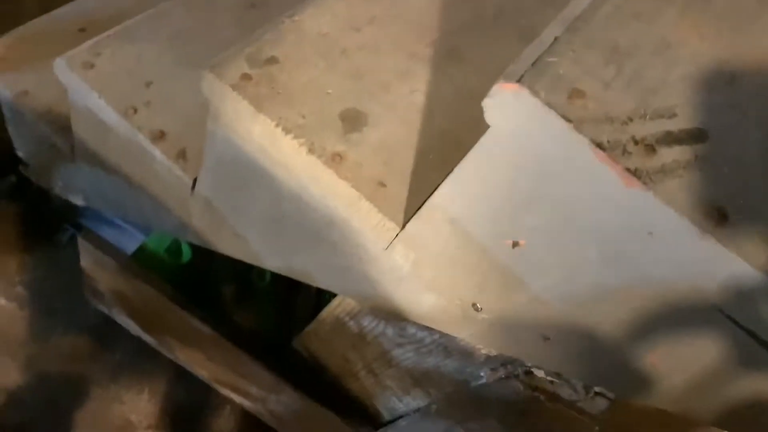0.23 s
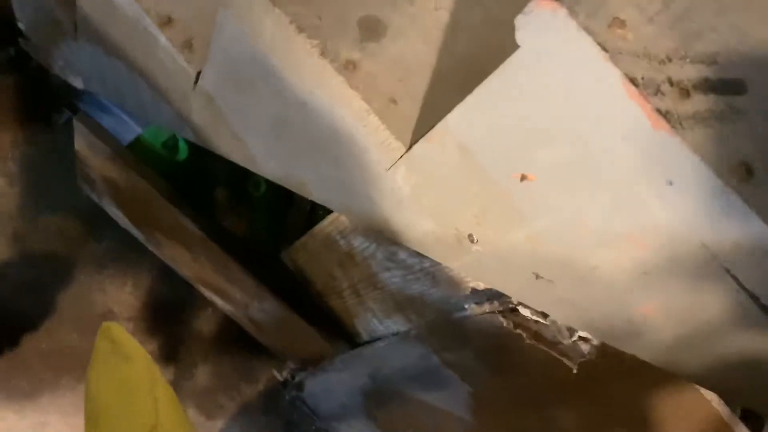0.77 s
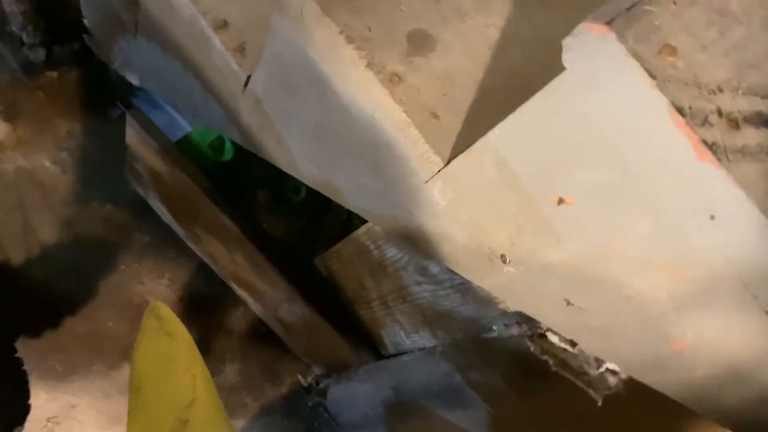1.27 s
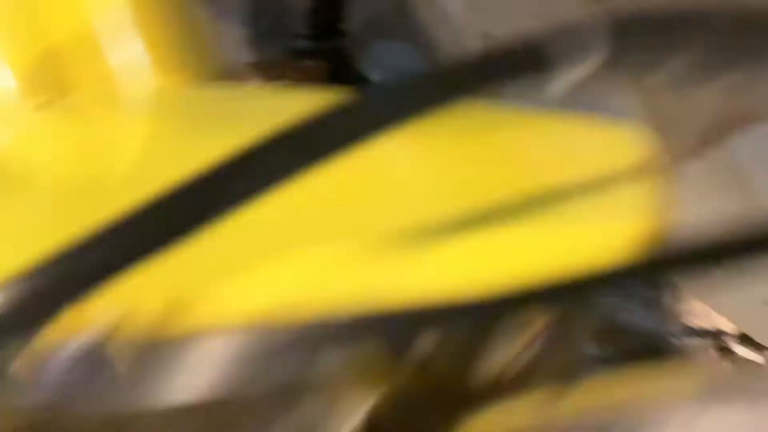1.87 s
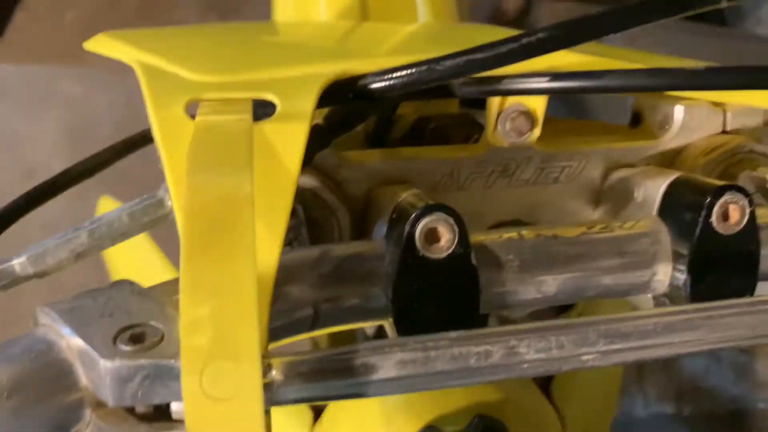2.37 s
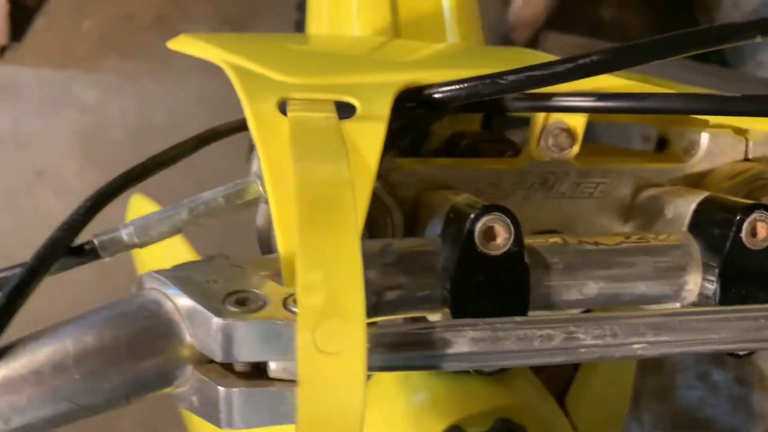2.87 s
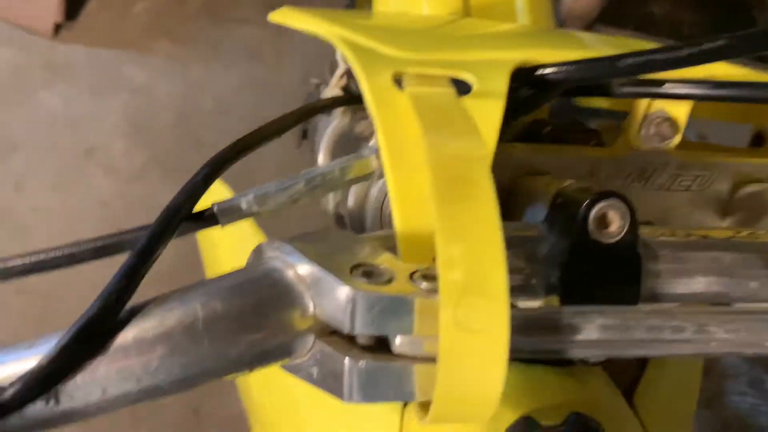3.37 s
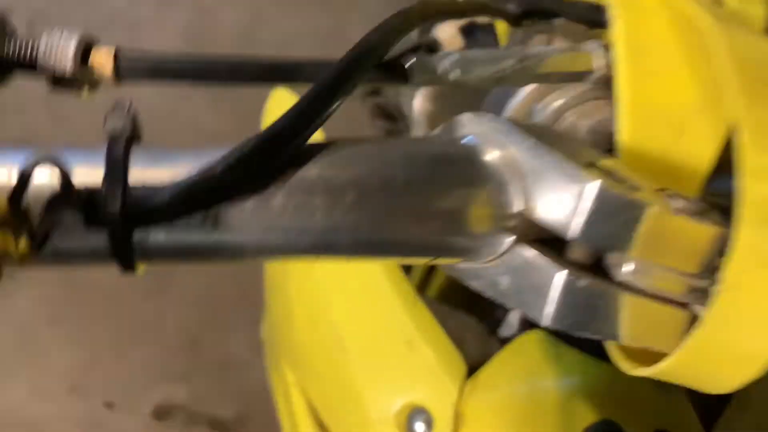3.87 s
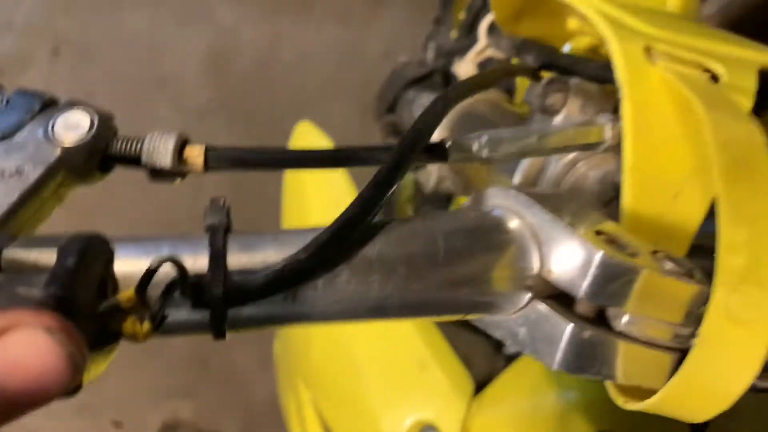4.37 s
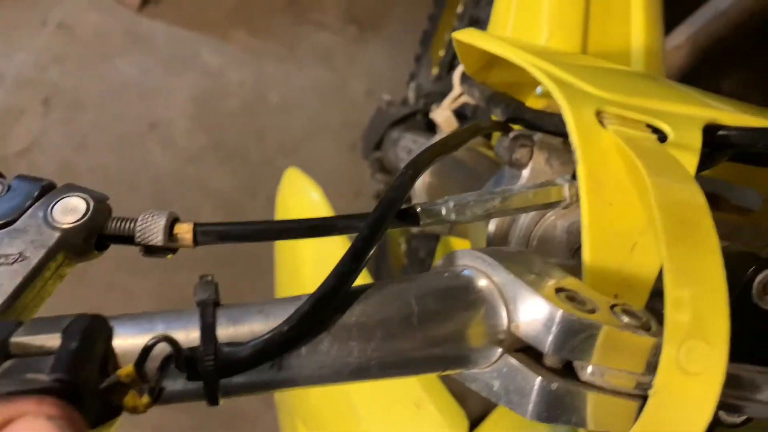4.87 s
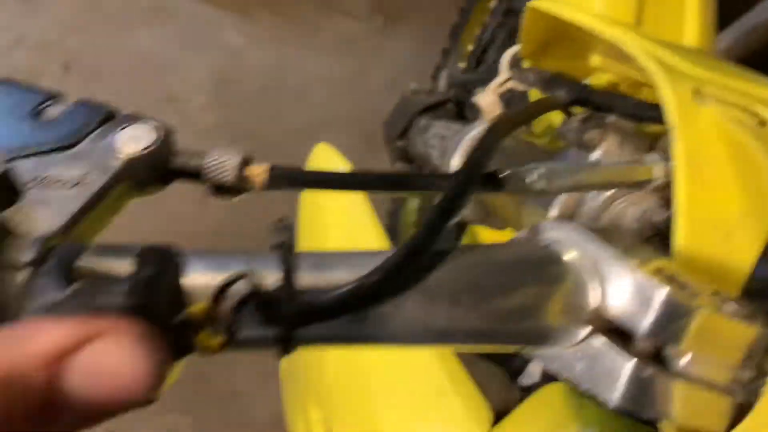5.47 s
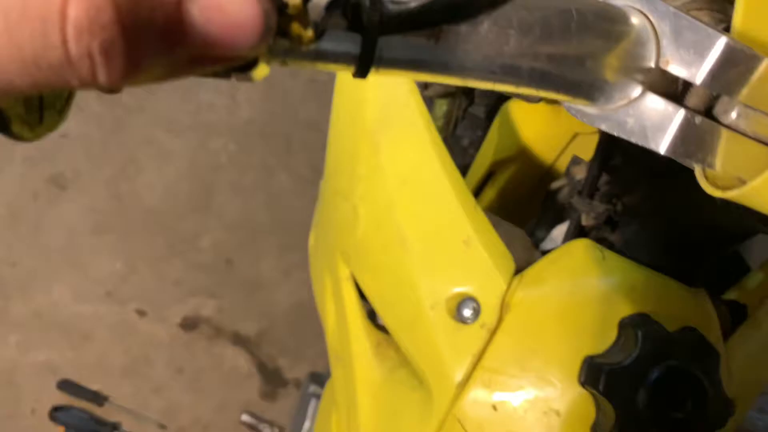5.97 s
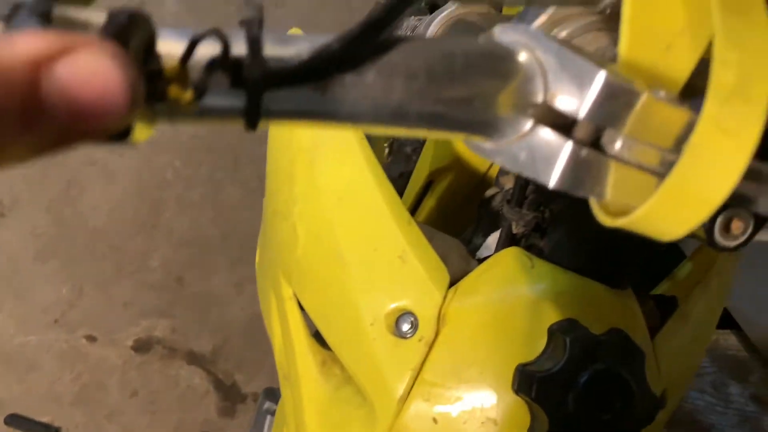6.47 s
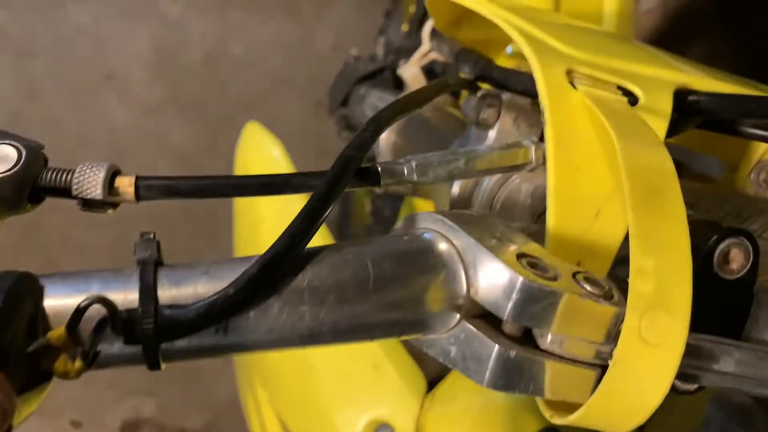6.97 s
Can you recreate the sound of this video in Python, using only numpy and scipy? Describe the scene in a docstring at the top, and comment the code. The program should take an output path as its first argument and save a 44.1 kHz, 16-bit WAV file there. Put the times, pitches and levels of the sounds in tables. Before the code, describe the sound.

In a small garage, a metal lever clacks loudly, cloth rustles, then two hard kicks crank a motorcycle engine that gulps air without firing.

```python
"""A two-stroke dirt bike in a garage is kicked over twice and does not catch.
A steel kick lever clacks against its stop and rings; the rider rubs, squeaks and bumps while climbing on.
Each kick rattles the gears (noise grains, driven modes) and pumps air through airbox and pipe (booms, churn);
the ratchet clicks (noise ticks, struck modes). Low noise and a faint hum lie behind, their level set by a table."""
import sys
import numpy as np
from scipy import signal
from scipy.fft import rfft, irfft, next_fast_len
from scipy.io import wavfile
from scipy.ndimage import map_coordinates

SR = 44100
rng = np.random.default_rng(int(sys.argv[2]) if len(sys.argv) > 2 else 0)


def master(y):
    """Save y as 16-bit WAV."""
    cut = np.clip(np.atleast_2d(y).T, -1, 1)
    pcm = np.round(cut * 32767)  # scale
    wavfile.write(sys.argv[1], SR, pcm.astype(np.int16))


N = 318843

# modes of the kick lever and of the frame behind it: (frequency [Hz], level [dB], t60 [s])
STEEL_MODES = [(398, -11, .2), (681, -8, 0.18), (1347, -4, 0.059), (1530, -5, 0.091), (2337, -8, 0.32),
               (3220, -1.5, .11), (3962, -6.5, 0.092), (4800, -14, .22), (6239, -2.5, .125),
               (7500, -2.5, .11), (9343, 2.5, .08), (9770, 0, .11), (10670, -0.5, 0.087), (12360, -0.5, .1)]
# springs and linkage singing as they scrape: (frequency [Hz], width [Hz], level [dB])
SPRING_MODES = [(2400, 88, -0.5), (4530, 140, -5), (6640, 80, -3), (7240, 70, -1.5), (9380, 110, -0.5),
                (11300, 120, -5), (12500, 100, -5.5)]
# spectrum of bright metallic chatter: (frequency [Hz], density [dB per Hz])
CHATTER_SPECTRUM = [(800, -27), (2500, -9.5), (4200, -3), (5400, 1.5), (7000, 2), (9500, 2), (12800, 2.5),
                    (13600, -6), (15500, -3.5)]
# spectrum of a bright metal tick: (frequency [Hz], density [dB per Hz])
TICK_SPECTRUM = [(500, -38), (2500, -20), (5000, -2.5), (7000, 0.5), (9500, 5), (12800, -1), (13800, -6.5),
                 (15200, -4.5)]
# spectrum of the pawl and linkage body: (frequency [Hz], density [dB per Hz])
PAWL_SPECTRUM = [(100, -21), (350, 3.5), (1000, 0), (1700, -0.5), (2900, -1), (4500, -4.5), (7000, -11),
                 (14000, -33.5)]


def amp(db):
    """Decibels to gain."""
    return 10 ** (np.asarray(db) / 20)


def unit(x):
    """Scale to rms 1."""
    return x / np.sqrt(np.mean(x ** 2) + 1e-20)


def along(points, hz):
    """(Hz, value) points read on a log-frequency axis."""
    f, v = np.transpose(points)
    return np.interp(np.log(hz + 1), np.log(f + 1), v)


def wobble(rate, size=12):
    """A smooth random curve, rate knots a second."""
    knots = rng.standard_normal(int(N * rate / SR) + 4)
    steps = np.arange(len(knots) * size) / size
    return np.interp(np.arange(N) * rate / SR, steps, map_coordinates(knots, [steps]))


def filtered(x, response):
    """x times a complex response of frequency."""
    m = next_fast_len(N + SR // 2)
    return irfft(rfft(x, m) * response(np.fft.rfftfreq(m, 1 / SR)), m)[..., :N]


def coloured(x, spectrum, size=4096):
    """x through a causal (minimum-phase) filter with the given spectrum."""
    cepstrum = irfft(np.log(amp(along(spectrum, np.fft.rfftfreq(size, 1 / SR)))))
    cepstrum[1:size // 2] *= 2
    cepstrum[size // 2 + 1:] = 0
    impulse = irfft(np.exp(rfft(cepstrum)))
    return signal.fftconvolve(x, impulse)[:len(x)]


def add(track, s, sound):
    """Mix a sound in at time s."""
    part = track[max(round(s * SR), 0):][:len(sound)]
    part += sound[:len(part)]


def envelope(s, rise, length, t60):
    """A gain per sample: rises from time s, holds until length has passed, then dies away."""
    t = np.arange(N) / SR - s
    return np.clip(t / rise, 0, 1) * amp(-60 * np.maximum(t - length, 0) / t60)


def burst(spectrum, rise, t60):
    """A short coloured noise burst, its strength set by an envelope of peak 1."""
    t = np.arange(SR // 4) / SR
    shape = (1 - np.exp(-t / rise)) * amp(-60 * t / t60)
    noise = unit(coloured(rng.standard_normal(len(t)) * shape, spectrum))
    return noise * np.sqrt(np.mean(shape ** 2)) / shape.max()


def grains(rate, spread_db, life, smooth):
    """Tiny contacts at random times and sizes, over a share of smooth rubbing."""
    hits = (rng.random(N) < rate / SR) * amp(spread_db * np.clip(rng.standard_normal(N), -2, 2))
    power = signal.lfilter([1], [1, -np.exp(-2 / (life * SR))], hits ** 2)
    return np.sqrt(power / power.mean() + abs(smooth)) * rng.standard_normal(N)


def drone(modes):
    """Driven resonances: each wanders in phase and strength as fast as its width allows."""
    t = np.arange(N) / SR
    total = np.zeros(N)
    for hz, width, db in modes:
        strength = amp(db + 0.69 * wobble(width))
        total += strength * np.sin(2 * np.pi * hz * t + .7 * wobble(width))
    return unit(total)


def swell(t, peak_s):
    """A soft push that peaks at 1 after peak_s and dies away."""
    return (t / peak_s * np.exp(1 - t / peak_s)) ** 2


def boom(t, hz, glide, peak_s):
    """A cavity rung by a soft push; its pitch glides by some octaves while it sounds."""
    pitch = hz * 2 ** (glide * np.minimum(t / (2 * peak_s), 1))
    return swell(t, peak_s) * np.sin(2 * np.pi * np.cumsum(pitch) / SR)


def ring(modes, t, scatter_db):
    """A struck part's ring: mode strengths vary by contact, the loose joint roughens each mode's phase."""
    total = np.zeros(len(t))
    for hz, db, t60 in modes:
        decay = amp(db + scatter_db * rng.normal() - 60 * t / t60)
        cycles = hz * t + rng.random() + rng.normal(0, .003, len(t)).cumsum()
        total += decay * np.sin(2 * np.pi * cycles)
    return total


def ambience():
    """Low noise and a faint, slightly unsteady hum, raised and lowered together, over a steady hiss."""
    # shared level course of noise and hum: (time [s], level [dB])
    level_course = [(0, -74.5), (0.699, -58.5), (2.4, -63), (3.4, -72), (4.899, -66.5), (5.701, -62),
                    (7.23, -62.5)]
    # low noise spectrum: (frequency [Hz], density [dB per Hz])
    floor_spectrum = [(20, -20.5), (50, 0), (90, 2.5), (160, -6.5), (230, -3.5), (430, -17), (600, -19),
                      (850, -26.5), (2000, -40), (7000, -41.5), (12500, -33), (16000, -49.5)]
    # hum in the garage: (frequency [Hz], level [dB])
    hum_lines = [(86.1, -75.5), (226.1, -78), (366.1, -78.5), (489.9, -76), (602.9, -80.5)]
    t = np.arange(N) / SR
    s, db = np.transpose(level_course)
    level = amp(np.interp(t, s, db))
    air = unit(filtered(rng.standard_normal(N), lambda hz: amp(along(floor_spectrum, hz))))
    hum = sum(amp(line_db) * np.sin(2 * np.pi * hz * t + .3 * wobble(3.1)) for hz, line_db in hum_lines)
    hiss = amp(-82.5) * unit(coloured(rng.standard_normal(N), [(1500, -2.0), (12000, -10.5)]))
    return level * air + amp(3.5) * hum * level / level[-1] + hiss


def rider():
    """Clothes and boots rub on seat and floor, and the springs scrape under the rider's weight."""
    # moves, each a swell that fades: (time [s], rise [s], t60 [s], rub level [dB], swish level [dB])
    moves = [(0, 0.0022, 2.1, -70, -77), (.25, 0.0082, 0.8, -66, -83), (.41, 0.16, .1, -63, -59.5),
             (1.07, 0.033, 0.59, -59.5, -60.5), (1.245, 0.046, 0.29, -52.5, -52),
             (1.484, 0.028, 0.52, -66.5, -67), (1.59, 0.02, 0.88, -65.5, -68.5),
             (1.86, 0.091, 0.22, -62, -70.5), (2.109, 0.043, 0.36, -55, -58), (2.38, 0.14, 0.9, -62, -64),
             (2.87, 0.043, 1.9, -64, -73.5), (3.053, 0.0096, 0.19, -48, -61.5),
             (3.1, 0.037, 0.15, -50, -46), (3.683, 0.016, 0.19, -50.5, -62), (4.6, 0.032, 0.27, -64.5, -84),
             (5.055, 0.028, 0.12, -39, -64), (6.643, 0.0054, 0.21, -63.5, -84),
             (6.708, .012, 0.47, -61.5, -70), (6.806, 0.042, 0.19, -55, -64),
             (7.078, .012, 0.45, -63.5, -84.5), (7.175, 0.045, .6, -63.5, -84.5)]
    # rubbing spectrum: (frequency [Hz], density [dB per Hz])
    cloth_spectrum = [(100, -13.5), (280, 4.5), (600, 1.5), (1200, -1.5), (2200, -5.5), (4000, -11),
                      (12000, -41)]
    rub, swish = np.zeros((2, N))
    for s, rise, t60, rub_db, swish_db in moves:
        shape = envelope(s, rise, rise, t60)
        rub += amp(rub_db) * shape
        swish += amp(swish_db) * shape
    cloth = unit(coloured(grains(rate=160, spread_db=1.5, life=0.008, smooth=0.9), cloth_spectrum))
    grit = unit(coloured(grains(rate=460, spread_db=5.0, life=.002, smooth=.8), CHATTER_SPECTRUM))
    return amp(0.5) * rub * cloth + swish * (amp(-3.5) * grit + amp(-10.5) * drone(SPRING_MODES))


def squeaks():
    """Rubber sticks and slips on a short, rough, rising note; light slips have weaker overtones."""
    # soles and grips: (time [s], length [s], pitch [Hz], rise [octaves], level [dB])
    slips = [(1.056, 0.082, 1158, 0.59, -63.5), (1.268, .08, 758, 0.041, -61)]
    out = np.zeros(N)
    for s, length, hz, rise, db in slips:
        u = np.linspace(0, 1, round(length * SR))
        pitch = hz * 2 ** (rise * u + 0.046 * wobble(700)[:len(u)])
        phase = 2 * np.pi * np.cumsum(pitch) / SR
        rolloff = np.interp(db, [-72, -62], [3, .4])
        note = sum(np.sin(k * phase) / k ** rolloff for k in range(1, 5))
        add(out, s, amp(db) * unit(note) * np.sin(np.pi * u))
    return out


def rocking():
    """Tyres and suspension take the rider's weight with an uneven low rumble."""
    # the bike rocking as the rider gets on: (time [s], rise [s], t60 [s], level [dB])
    rocks = [(1.582, 0.037, 1.7, -43)]
    # rumble spectrum: (frequency [Hz], density [dB per Hz])
    rumble_spectrum = [(30, -13.5), (70, -4), (115, -0.5), (200, -1.5), (300, -19.5), (600, -35.5),
                       (2000, -62.5)]
    lumps = unit(coloured(grains(rate=29, spread_db=3.5, life=.02, smooth=.5), rumble_spectrum))
    return lumps * sum(amp(db) * envelope(s, rise, rise, t60) for s, rise, t60, db in rocks)


def bumps():
    """Soft contacts boom in tank, seat and tyres, whose pitch slides as the load shifts."""
    # contacts of rider and chassis: (time [s], level [dB], pitch [Hz], glide [octaves])
    contacts = [(0.566, -32.5, 266, -.02), (0.721, -47, 310, -.2), (1.562, -47, 305, -.2),
                (1.615, -31.5, 231, -.19), (1.63, -39, 110, -.17), (2.188, -48.5, 270, -.1),
                (2.62, -51.5, 249, 0), (2.72, -47.5, 256, 0), (3.062, -36.5, 255, 0),
                (3.13, -43.5, 275.2, 0), (3.88, -18, 262, 0), (4.402, -35.5, 256, 0), (5.148, -16, 261, 0)]
    peak_cycles = 4
    out, t = np.zeros(N), np.arange(SR // 4) / SR
    for s, db, hz, glide in contacts:
        thud_spectrum = [(hz / 4, -12), (hz, 0), (hz * 4, -30), (hz * 16, -60)]
        add(out, s, amp(db) * boom(t, hz, glide, peak_cycles / hz))
        add(out, s, amp(db - 12) * burst(thud_spectrum, rise=0.01, t60=0.22))
    return out


def pings():
    """Small springs and fittings at the handlebar ring, each on one thin note."""
    # (time [s], frequency [Hz], level [dB])
    notes = [(2.128, 4290, -64), (2.128, 4980, -66.5), (5.843, 9485, -55.5), (6.515, 9485, -72)]
    t60_s = 0.4
    out, t = np.zeros(N), np.arange(SR) / SR
    for s, hz, db in notes:
        add(out, s, amp(db - 60 * t / t60_s) * np.sin(2 * np.pi * hz * t))
    return out


def knocks():
    """Heavy parts take up their slack with a dull knock; biting teeth ring the gear case."""
    # gears and chassis taking up slack: (time [s], level [dB])
    slack_hits = [(0.255, -48.5), (0.774, -44.5), (1.255, -48), (1.93, -49.5), (2.193, -38.5),
                  (2.617, -47.5), (2.674, -47), (3.06, -45), (3.708, -25), (3.878, -18.5), (3.915, -22),
                  (3.962, -25), (5.091, -22), (5.144, -13.5), (5.159, -16), (5.228, -22), (5.255, -24),
                  (5.368, -31), (5.786, -47)]
    # knock spectrum: (frequency [Hz], density [dB per Hz])
    knock_spectrum = [(100, -25.5), (300, -3.5), (550, -2), (850, 0), (1350, -1), (2000, -14),
                      (3500, -32.5), (12000, -35.5)]
    # the starter gear's teeth bite: (time [s], level [dB])
    tooth_bites = [(3.708, -25), (5.091, -25.5)]
    # gear case modes: (frequency [Hz], level [dB], t60 [s])
    case_modes = [(850, 3.5, 0.049), (1180, -5.5, .07), (1334, 0.5, .075)]
    out, t = np.zeros(N), np.arange(SR // 4) / SR
    for s, db in slack_hits:
        add(out, s, amp(db - 5) * burst(knock_spectrum, rise=.0015, t60=0.033))
    for s, db in tooth_bites:
        onset = 1 - np.exp(-t / .002)
        add(out, s, amp(db) * ring(case_modes, t, scatter_db=1) * onset)
    return out


def clicks():
    """The pawl snaps over its teeth: a bright tick, and linkage and lever answer."""
    # pawl, linkage and small controls: (time [s], level [dB], body level re the tick [dB])
    snaps = [(2.582, -58, 4.5), (2.6744, -53, 1), (3.0585, -49.5, 0), (3.809, -28.5, -20), (3.869, -26, -7),
             (4.15, -53.5, 4), (4.277, -21.5, -8), (4.366, -22, -7), (4.48, -23, -5), (4.7398, -57.5, 3.5),
             (4.9486, -49, -10.5), (4.9989, -34.5, 6), (5.0911, -24.5, -6.5), (5.168, -15.5, -5),
             (5.1946, -19, -14), (5.229, -17, -13), (5.367, -22.5, -5), (5.4053, -11.5, -17.5),
             (5.5148, -38, -8), (5.7019, -51, -5.5), (5.7851, -55, -1), (5.8401, -45.5, -23),
             (6.2492, -54.5, -8), (6.612, -66, 7), (6.8098, -46.5, -8), (6.976, -67.5, 8)]
    out, t = np.zeros(N), np.arange(SR // 4) / SR
    for s, db, body_db in snaps:
        add(out, s, amp(db - 8.0) * burst(TICK_SPECTRUM, rise=0.00051, t60=0.02))
        add(out, s, amp(db + body_db - 6.0) * burst(PAWL_SPECTRUM, rise=.001, t60=0.062))
        add(out, s, amp(db + body_db - 25) * ring(STEEL_MODES, t, scatter_db=2))
    return out


def lever():
    """The steel kick lever swings out against its stop: a crack, and its modes ring."""
    # (time [s], level [dB])
    stop_hits = [(0.554, -7)]
    out, t = np.zeros(N), np.arange(SR // 2) / SR
    for s, db in stop_hits:
        add(out, s, amp(db - 19) * ring(STEEL_MODES, t, scatter_db=.5))
        add(out, s, amp(db - 8) * burst(TICK_SPECTRUM, rise=.0006, t60=.06))
        add(out, s, amp(db - 25.5) * burst(PAWL_SPECTRUM, rise=0.0024, t60=0.074))
    return out


def piston():
    """Every unfired stroke pushes a low puff out of the pipe and gulps a chug of air through the airbox."""
    # (time [s], puff level [dB], chug level [dB], chug pitch [Hz])
    strokes = [(3.76, -61.5, -30.5, 300), (3.812, -33.5, -30, 275), (3.872, -36.5, -24.5, 400),
               (3.912, -41, -20, 275), (3.96, -42, -23.5, 345), (4.005, -40, -24.5, 330),
               (5.107, -23.5, -19.5, 262), (5.131, -19.5, -21.5, 390), (5.152, -27.5, -12, 330),
               (5.2, -18, -21, 300), (5.294, -25, -27.5, 350)]
    # pipe gas spectrum: (frequency [Hz], density [dB per Hz])
    puff_spectrum = [(20, -33.5), (45, -7.5), (80, -5), (135, 0.5), (175, -8.5), (400, -26), (1500, -72.5)]
    swell_s, pipe_hz = 0.009, 124
    sag_oct = .12  # the pitch sinks as the port closes
    out, t = np.zeros(N), np.arange(SR // 4) / SR
    for s, puff_db, chug_db, hz in strokes:
        gas = unit(coloured(rng.standard_normal(len(t)), puff_spectrum)) * swell(t, .022)
        puff = boom(t, pipe_hz, -sag_oct, swell_s) + amp(-5) * gas
        add(out, s, amp(puff_db - 2.0) * puff)
        add(out, s, amp(chug_db - 3.0) * boom(t, hz, -sag_oct, swell_s))
    return out


def airbox(flow):
    """Pumped air rings airbox and pipe; the harder the flow, the more of it breaks into a rough churn."""
    # airbox and pipe resonances: (frequency [Hz], width [Hz], level [dB])
    air_modes = [(260.5, 17, -1.5), (298.3, 21, -10), (337.4, 14, -3.5), (409, 22, -9.5),
                 (442.6, 20, -16.5)]
    # churn spectrum: (frequency [Hz], density [dB per Hz])
    intake_spectrum = [(80, -38), (180, -16.5), (260, -0.5), (360, -4), (500, -11), (800, -21),
                       (3000, -58.5)]
    churn = unit(coloured(grains(rate=110, spread_db=4.0, life=0.011, smooth=0.26), intake_spectrum))
    rough = np.clip(0.56 + 0.42 * flow / flow.max(), 0, 1)
    return amp(-1.0) * flow * (np.sqrt(1 - rough) * drone(air_modes) + np.sqrt(rough) * churn)


def effort():
    """Airflow, gear load, chatter: a kick is a light press, a thrust, a run-down; the spring drags gears too."""
    # the boot takes up the slack, then the rider's weight thrusts the lever down and spins the crank:
    # (gears bite [s], take-up [s], air build-up [s], surge [s], thrust [s], pumping [s],
    #  airflow level [dB], gear load level [dB], chatter level [dB])
    kicks = [(3.702, 0.15, .13, .022, 0.074, 0.16, -28.5, -30, -36),
             (4.996, 0.09, .02, 0.076, .15, .1, -17, -25, -31)]
    # the return spring winding up or pulling the lever back:
    # (time [s], rise [s], length [s], t60 [s], gear load level [dB], chatter level [dB])
    spring_pulls = [(3.703, .03, .06, 0.29, -57.5, -40), (4.148, 0.065, 0.37, 0.45, -56.5, -58),
                    (5.302, .04, .12, 0.59, -39.5, -41.5)]
    press_air_db = -32.5
    press_gear_db, press_chatter_db = -15.5, -21.5  # re the thrust
    bite_s = .012  # the teeth engage almost at once
    air_t60_s, gear_t60_s, chatter_t60_s = 0.26, 0.34, 0.3  # the crank runs down
    drag_air_db, drag_air_t60_s = -0.5, 1  # dragged gears stir the airbox; dB re their load
    flow, load, chatter = np.zeros((3, N))
    for s, take_up, build, surge, thrust, pumping, air_db, gear_db, chatter_db in kicks:
        down = s + take_up
        press = envelope(s, bite_s, take_up, gear_t60_s)
        press_air = amp(press_air_db) * envelope(s, build, take_up, air_t60_s)
        thrust_air = amp(air_db) * envelope(down, surge, pumping, air_t60_s)
        thrust_load = envelope(down, surge, thrust, gear_t60_s)
        thrust_chatter = envelope(down, bite_s, thrust, chatter_t60_s)
        flow += np.maximum(press_air, thrust_air)
        load += amp(gear_db) * np.maximum(amp(press_gear_db) * press, thrust_load)
        chatter += amp(chatter_db) * np.maximum(amp(press_chatter_db) * press, thrust_chatter)
    for s, rise, length, t60, gear_db, chatter_db in spring_pulls:
        pull = envelope(s, rise, length, t60)
        stirred = amp(gear_db + drag_air_db) * envelope(s, rise, length, drag_air_t60_s)
        flow = np.hypot(flow, stirred)
        load = np.hypot(load, amp(gear_db) * pull)
        chatter = np.hypot(chatter, amp(chatter_db) * pull)
    return flow, load, chatter


def cranking():
    """Each kick spins the gears against the cases, winds the return spring and draws air through the engine."""
    # gear teeth heard through the cases: (frequency [Hz], density [dB per Hz])
    cases_spectrum = [(120, -33.5), (350, 0.5), (600, -3), (1150, -3.5), (1600, -4.5), (2200, -7),
                      (3200, -13), (6000, -23.5), (15000, -53)]
    # crankcase and covers ringing: (frequency [Hz], width [Hz], level [dB])
    cover_modes = [(594, 13, 0.5), (679.6, 12, 4.5), (744, 29, 0.5), (859, 13, -2), (1002, 14, 1.5),
                   (1160, 39, 2), (1192, 23, -2.5), (1267, 11, -2.5), (1575, 13, -2)]
    flow, load, chatter = effort()
    teeth = unit(coloured(grains(rate=150, spread_db=1.5, life=0.004, smooth=.25), cases_spectrum))
    gears = amp(-2.5) * teeth + amp(-6.0) * drone(cover_modes)
    rattle = unit(coloured(grains(rate=340, spread_db=5, life=0.008, smooth=.5), CHATTER_SPECTRUM))
    jangle = amp(-3.5) * rattle + amp(-13.5) * drone(SPRING_MODES)
    return airbox(flow) + load * gears + chatter * jangle


def garage(x, wet_db, size=512):
    """The direct sound plus the walls' diffuse answer; each frequency has its own strength and decay."""
    # reverberation: (frequency [Hz], t60 [s])
    decay_times = [(100, 1), (300, 0.38), (1500, 0.28), (5000, 0.26), (10000, 0.19), (16000, 0.091)]
    hz, t, z = signal.stft(x, SR, nperseg=size)
    keep = amp(-120 * t[1] / along(decay_times, hz))  # power kept per frame
    power = np.array([signal.lfilter([0, 1 - k], [1, -k], abs(band) ** 2) for k, band in zip(keep, z)])
    band_gain = amp(3 * rng.standard_normal((len(hz), 1)))
    noise = signal.stft(rng.standard_normal(N), SR, nperseg=size)[2] * band_gain
    tail = signal.istft(np.sqrt(power) * noise / np.std(noise), SR, nperseg=size)[1]
    return x + amp(wet_db) * np.pad(tail, (size // 4, 0))[:N]


def spread(x, size=256):
    """Sound scattered off the bike reaches the two microphones a little later, with unrelated phases."""
    # likeness of the two microphones: (frequency [Hz], likeness [0-1])
    alike = [(100, 0.91), (300, 0.95), (600, 0.11), (1300, 0.41), (2500, 0.58), (5000, 0.037), (6500, 1),
             (16000, 1)]
    z = signal.stft(x, nperseg=size)[2]
    scattered = signal.istft(z * np.exp(2j * np.pi * rng.random(z.shape)), nperseg=size)[1]
    scattered = np.pad(scattered, (size // 3, 0))[:N]
    likeness = lambda hz: np.clip(along(alike, hz), 0, 1)
    mid = filtered(x, lambda hz: np.sqrt((1 + likeness(hz)) / 2))
    side = filtered(unit(scattered) * np.std(x), lambda hz: np.sqrt((1 - likeness(hz)) / 2))
    return np.array([mid + side, mid - side])


def scene():
    """Engine, metal contacts and rider in the garage, heard at two microphones."""
    moves = garage(rider() + squeaks(), wet_db=-8)
    thuds = garage(bumps() + rocking() + piston(), wet_db=-10, size=1024)
    metal = garage(knocks(), wet_db=-2) + garage(clicks() + pings(), wet_db=-1.5)
    metal += garage(lever(), wet_db=-5.5)
    engine = garage(cranking(), wet_db=-11.0, size=1024)
    return spread(engine + thuds + ambience(), size=1024) + spread(metal + moves, size=256)


def record(dry):
    """A close microphone pair: left-heavy in the middle range, a lag between them, bass cut and band limit."""
    # level balance: (frequency [Hz], left minus right [dB])
    left_excess = [(60, 2), (200, 2), (400, 5.5), (700, 7), (1300, 7), (2400, 9), (4400, 11.5), (6500, 0.5),
                   (16000, -0.5)]
    # phase by which left leads: (frequency [Hz], lead [rad])
    left_lead = [(50, 0), (200, .6), (400, 1), (500, 0), (620, -2.5), (800, -1), (1900, -1.2), (2600, -1.9),
                 (3500, -1.1), (4400, 0), (5200, 2.3), (6400, 0), (8600, -3.14), (10600, -6.2),
                 (11400, -6.35), (13450, -9.42), (15600, -12.56)]
    top_hz = 15850
    port = lambda hz: amp(along(left_excess, hz) / 2) * np.exp(.5j * along(left_lead, hz))
    bass_cut = lambda hz: (1j * hz / (1j * hz + 25)) ** 2
    band_limit = lambda hz: .5 - .5 * np.tanh((hz - top_hz) / 200)
    return filtered(dry, lambda hz: np.array([port(hz), 1 / port(hz)]) * bass_cut(hz) * band_limit(hz))


dry = scene()
out = record(dry)
master(out)
```